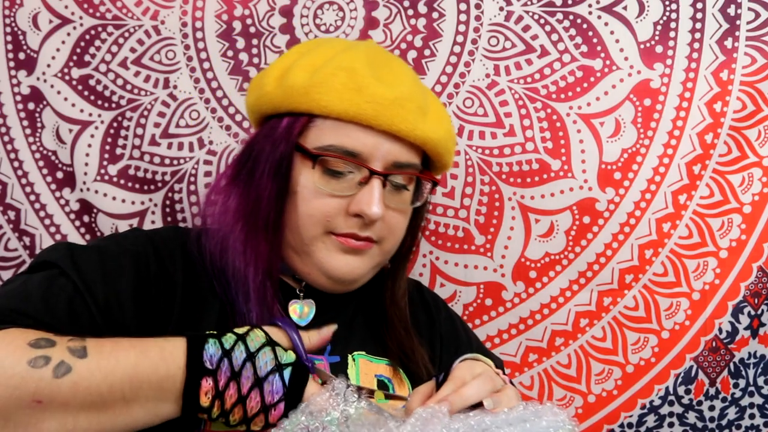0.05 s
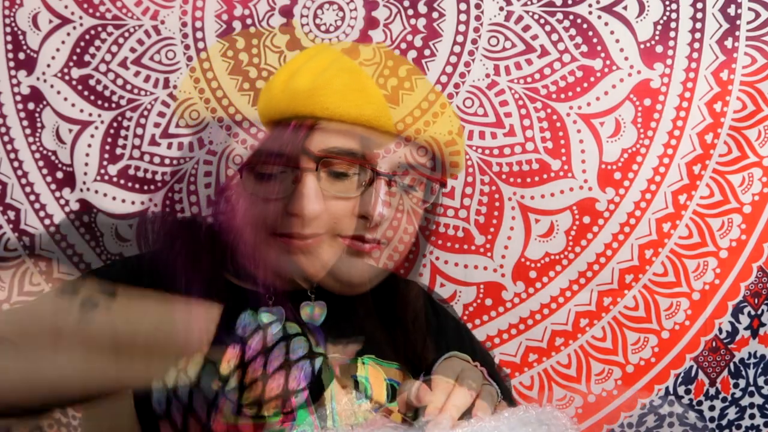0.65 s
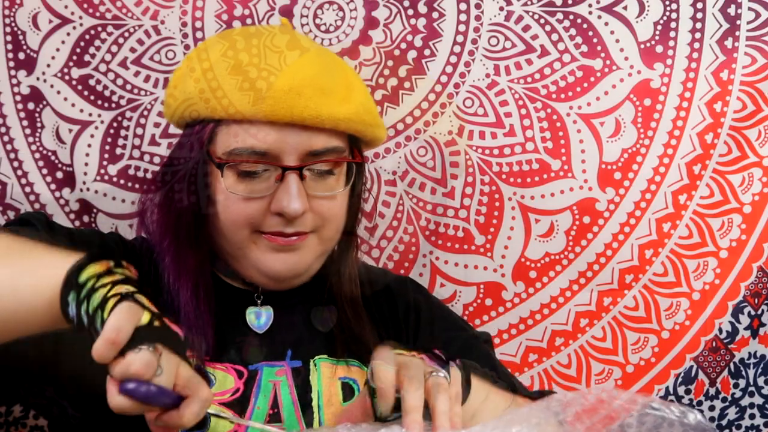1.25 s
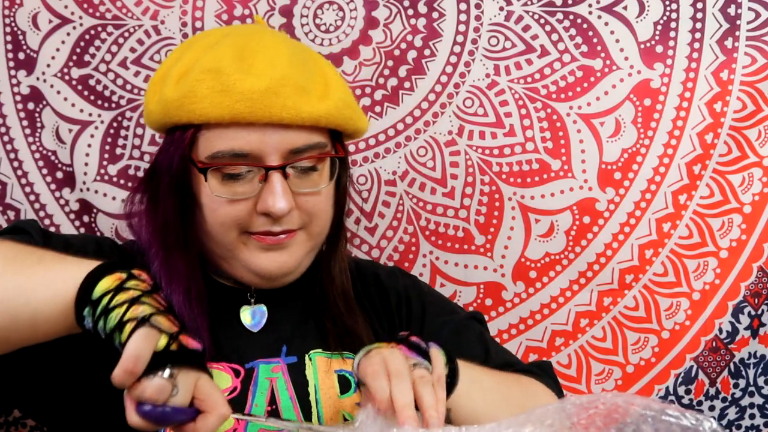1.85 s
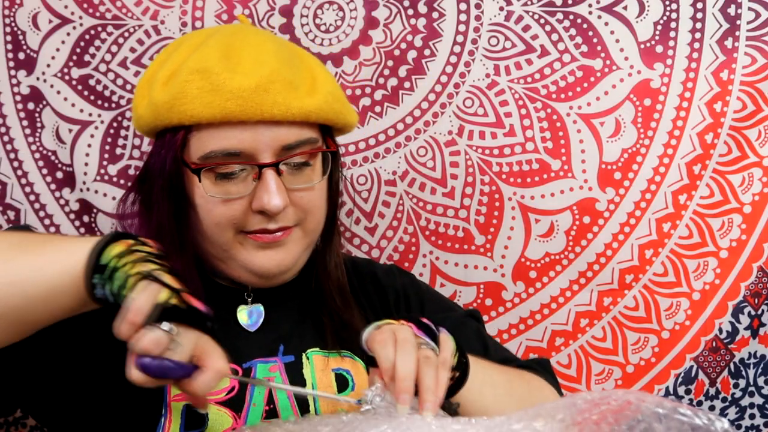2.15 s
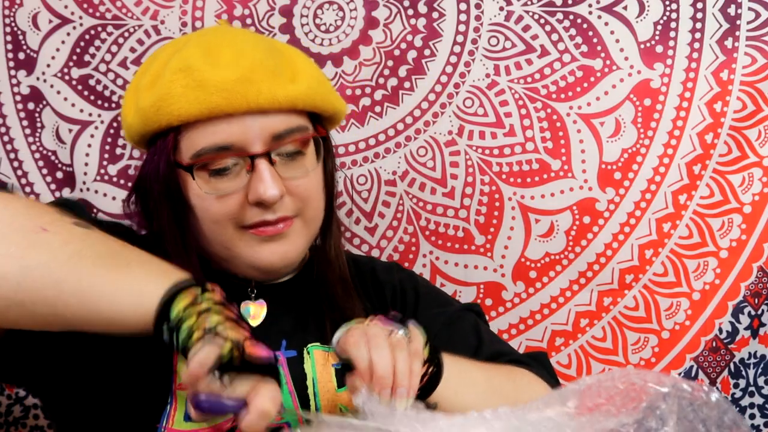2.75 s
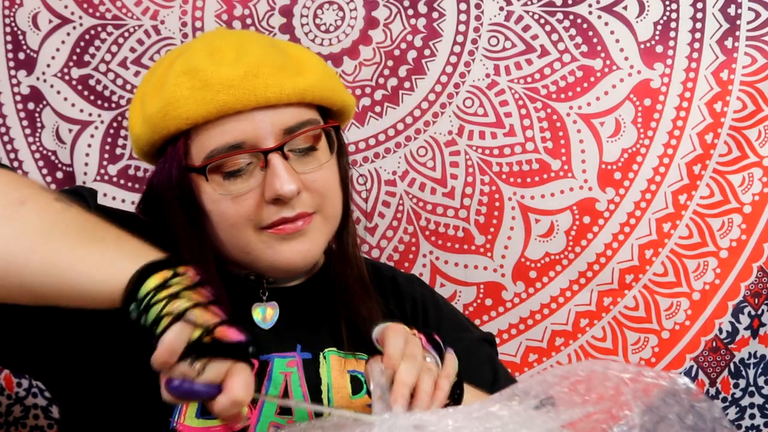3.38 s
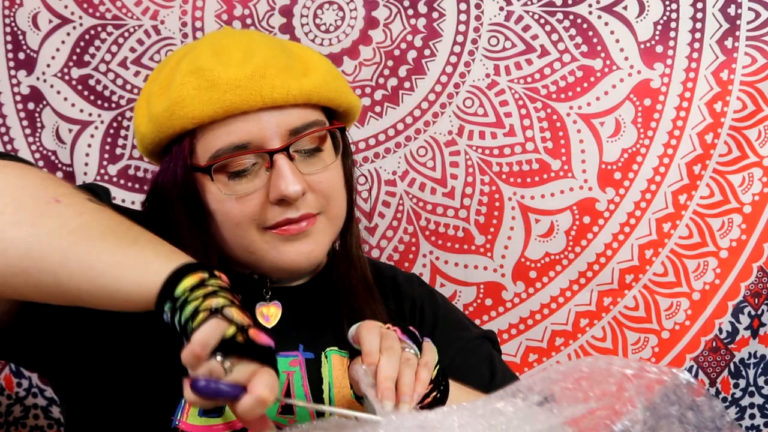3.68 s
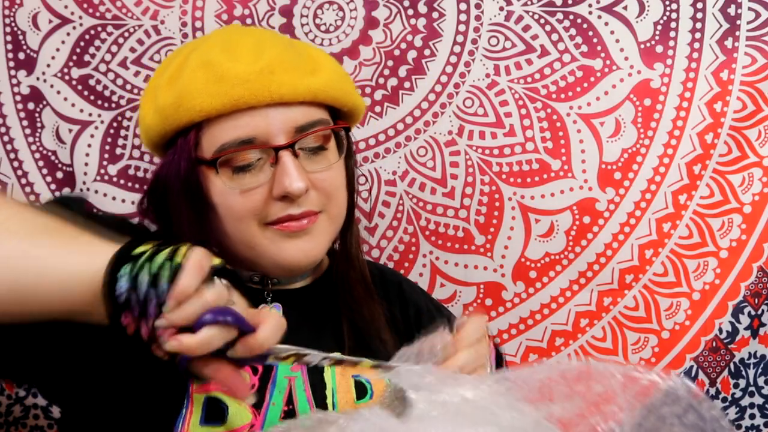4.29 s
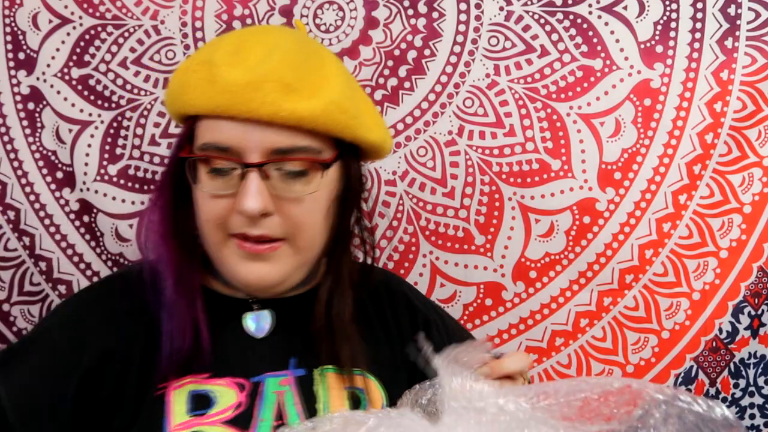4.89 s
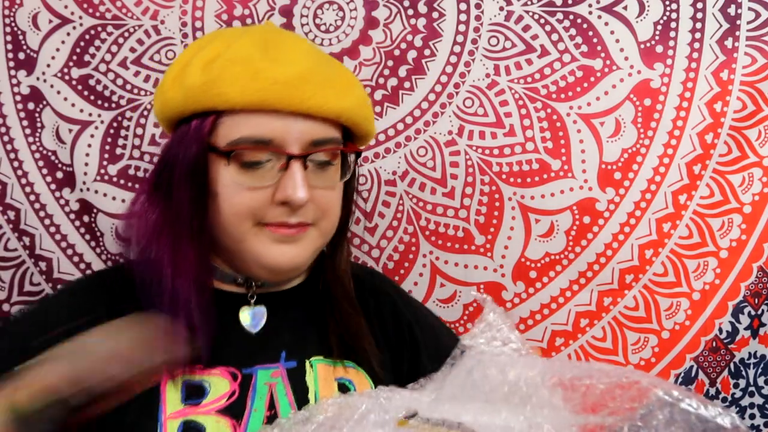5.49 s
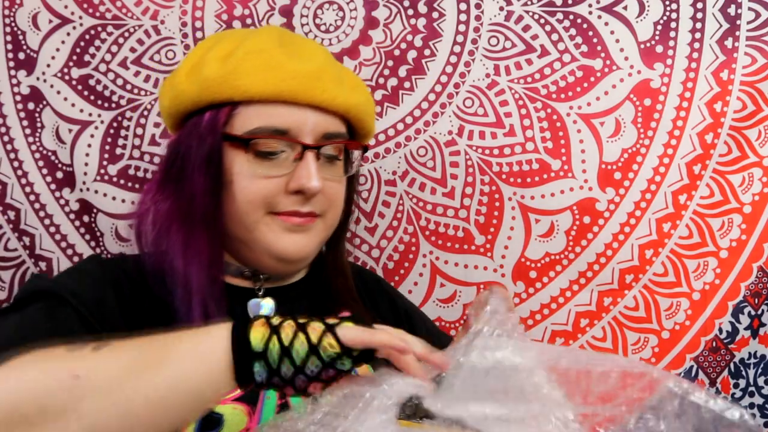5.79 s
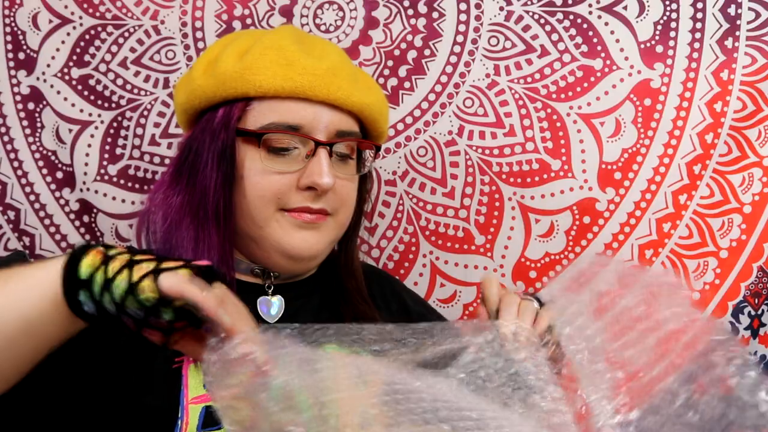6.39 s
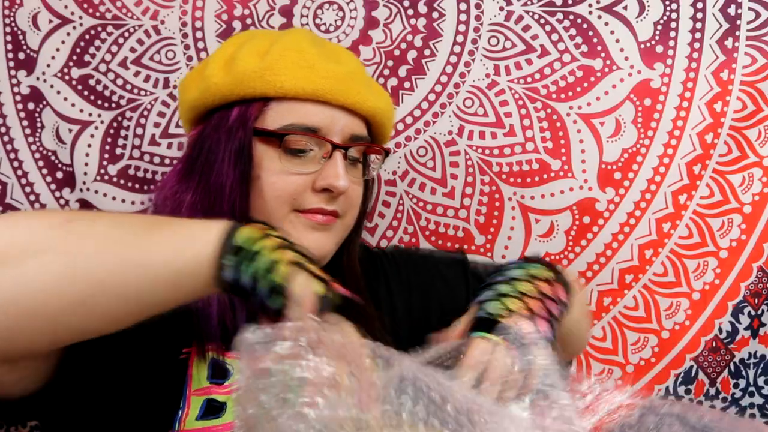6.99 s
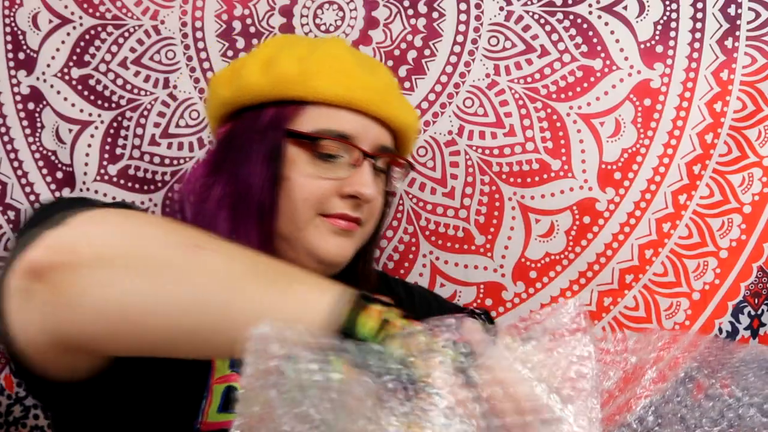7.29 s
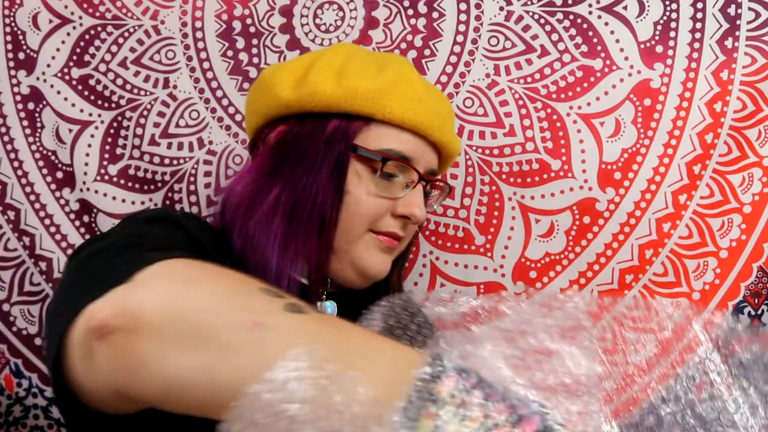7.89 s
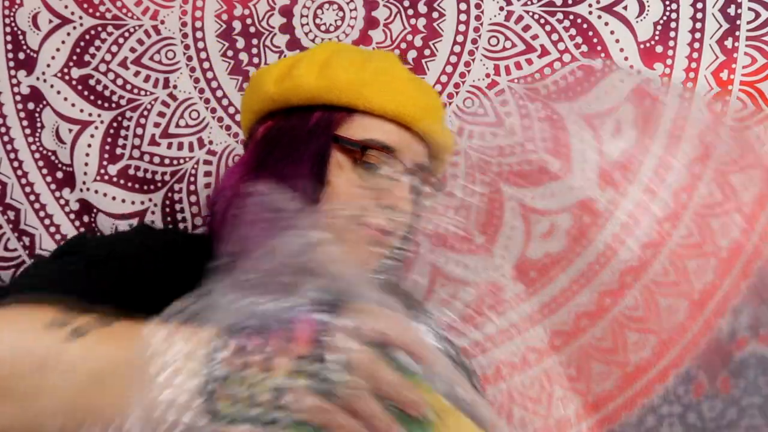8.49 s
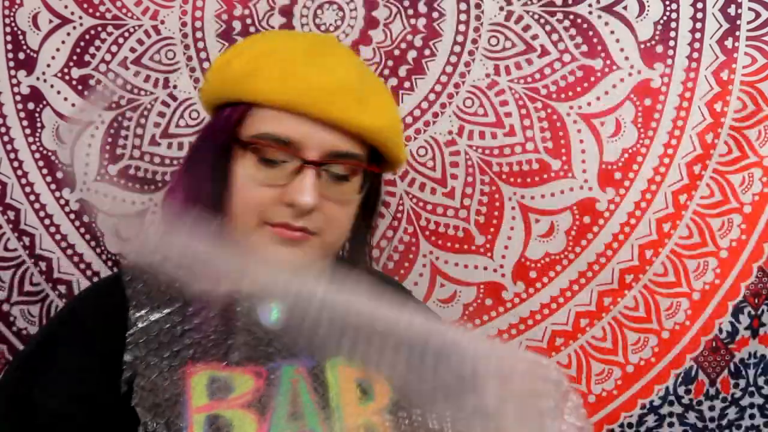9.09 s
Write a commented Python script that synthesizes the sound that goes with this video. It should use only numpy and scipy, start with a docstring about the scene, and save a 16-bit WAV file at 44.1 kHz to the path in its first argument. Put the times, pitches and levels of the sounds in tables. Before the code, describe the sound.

Scissors cut bubble wrap from a cardboard box in short, uneven strokes. The plastic crackles in showers of tiny clicks and sharp snaps, and the box takes soft, dull knocks. The blade squeaks once and later pops a bubble. After a brief lull, the freed sheet is pulled off, rustling, sliding and flapping, with a few tiny high pings. It is heard close up in a small room with a short echo.

```python
"""Bubble wrap crackles as scissors cut it from a cardboard box, then it is pulled off and lifted. Creases in
the plastic film buckle in showers of tiny clicks, and a few snap loudly. The sheet slides and flaps, taut
creases ping, and the box takes dull knocks. The blade squeaks once and pops one bubble. It is all heard close
up, in a small room with a short echo."""
import sys
import numpy as np
from scipy import signal
from scipy.fft import rfft, irfft, next_fast_len
from scipy.io import wavfile
from scipy.ndimage import map_coordinates

SR = 44100
rng = np.random.default_rng(int(sys.argv[2]) if len(sys.argv) > 2 else 0)


def pcm_store(signal):
    """Save signal as 16-bit PCM."""
    levels = np.round(np.clip(np.atleast_2d(signal), -1, 1) * 32767)
    wavfile.write(sys.argv[1], SR, levels.astype(np.int16).T)


N = 407925
TIME = np.arange(N) / SR


def amp(db):
    """Turn decibels into a number to multiply a sound by."""
    return 10 ** (np.asarray(db) / 20)


def along(points, hz):
    """Read a value between (Hz, value) points, spaced by musical pitch."""
    freqs, values = np.transpose(points)
    return np.interp(np.log(hz + 1), np.log(freqs), values)


def add(track, s, sound):
    """Mix a sound into the track at s seconds."""
    part = track[max(round(s * SR), 0):][:len(sound)]
    part += sound[:len(part)]


def wobble(rate):
    """A random curve that heads for a new value rate times a second."""
    return map_coordinates(rng.standard_normal(N // 8), [TIME * rate], order=1, mode="wrap")


def click(gain_db, size=2048):
    """The sharpest click of energy 1 with the tone gain_db(Hz)."""
    cepstrum = irfft(np.log(amp(gain_db(np.fft.rfftfreq(size, 1 / SR))) + 1e-6))
    # pack the energy at the start of the click
    cepstrum[1:size // 2] *= 2
    cepstrum[size // 2 + 1:] = 0
    pulse = irfft(np.exp(rfft(cepstrum)))
    return pulse / np.linalg.norm(pulse)


def hiss(tone):
    """Smooth noise with the given tone and an average power of 1."""
    colour = click(lambda hz: along(tone, hz), size=8192)
    noise = signal.oaconvolve(rng.standard_normal(N), colour)[:N]
    return noise / np.sqrt(np.mean(noise ** 2) + 1e-20)


def ripple(hz, per_octave):
    """Random peaks and dips in tone: each patch of film rings in its own way."""
    return map_coordinates(rng.standard_normal(80), [per_octave * np.log2(1 + hz / 100)], mode="nearest")


def buckles(rate, scatter_db, cap):
    """Creases give way: about rate kicks a second, very unequal in size, with average power near 1."""
    sizes = amp(scatter_db * np.minimum(rng.standard_normal(N), cap))
    kicks = (rng.random(N) < rate / SR) * sizes * rng.choice([-1, 1], N)
    window = signal.windows.hann(SR // 12)
    power = np.abs(signal.fftconvolve(kicks ** 2, window / window.sum(), "same"))
    return kicks / np.sqrt(power + 1e-6)


def avalanche(kicks, spill_db, span_s=.0014, count=2):
    """A buckle comes with small neighbours that give way just before and after it."""
    at = np.flatnonzero(kicks)
    shift, size = rng.standard_normal((2, count, N))[:, :, at]
    where = np.clip(at + np.round(shift * span_s * SR).astype(int), 0, N - 1)
    neighbours = amp(spill_db) * size * kicks[at]
    return kicks + np.bincount(where.ravel(), neighbours.ravel(), N)


def creases(kicks, tone, ripple_db, per_octave, count=200, size=1024):
    """Each kick sounds through one of many creases, each with its own ring."""
    clicks = [click(lambda hz: along(tone, hz) + ripple_db * ripple(hz, per_octave), size)
              for _ in range(count)]
    which, out = rng.integers(count, size=N), np.zeros(N + size)
    for at in np.flatnonzero(kicks):
        out[at:at + size] += kicks[at] * clicks[which[at]]
    return out[:N]


def movements(rows, attack_s, sag_db_per_s, release_db_per_s):
    """Power of crackle, treble and flapping: each movement takes hold, carries on and dies away."""
    power = np.zeros((3, N))
    for start, length, db, treble_db, flap_db in rows:
        span = slice(*np.searchsorted(TIME, [start, start + length + .5]))
        t = TIME[span] - start
        fade_db = sag_db_per_s * t + release_db_per_s * np.maximum(t - length, 0)
        envelope = np.minimum(t / attack_s, 1) * amp(db - fade_db)
        power[:, span] += (amp([[0], [treble_db], [flap_db]]) * envelope) ** 2
    return power


# Strokes of scissors and hand. Each row: start in seconds, length in seconds, level in dB,
# then treble and flapping, both in dB compared with that level.
SCISSOR_STROKES = [(-.04, 0.04, -44, -10, -11.5), (.165, 0.11, -51.5, -8, -9), (.25, .07, -43, -7.5, -13),
                   (.344, 0.21, -52, -3, -27), (.5, 0.13, -44, -10, -12), (.66, 0.16, -51.5, -6.5, -13.5),
                   (.815, .15, -48, -10, -11), (1.03, 0.11, -49.5, -5.5, -13),
                   (1.165, 0.19, -46.5, -7.5, -9.5), (1.38, 0.098, -45.5, -6, -13.5),
                   (1.485, 0.078, -40.5, -7.5, -17.5), (1.59, .11, -48, -5.5, -12.5),
                   (1.765, 0.052, -46, -5.5, -17), (1.85, .115, -38.5, -10, -12),
                   (1.98, .04, -45, -10, -18), (2.065, .135, -44, -12, -15.5),
                   (2.217, 0.12, -52.5, -18, -11.5), (2.535, .05, -44.5, -14, -16),
                   (2.66, 0.086, -46.5, -4, -13), (2.775, .19, -43.5, -6.5, -10),
                   (3.03, .065, -47.5, -8.5, -18), (3.165, .15, -46.5, -6, -15),
                   (3.315, 0.034, -42.5, -12, -10), (3.395, 0.058, -43.5, -6, -15),
                   (3.49, 0.049, -45.5, -14, -13), (3.585, .065, -50.5, -5, -5),
                   (3.68, 0.04, -48.5, -9, -13), (3.77, 0.19, -49, -7.5, -5), (3.865, 0.16, -48, -12, -9),
                   (4.07, 0.057, -37, -13, -12), (4.15, 0.14, -40, -8, -14.5),
                   (4.29, 0.05, -41.5, -8.5, -14), (4.395, .15, -45.5, -10.5, -10)]


def cuts():
    """How hard cutting stirs the wrap: the blades bite, then the film yields."""
    return movements(SCISSOR_STROKES, attack_s=0.026, sag_db_per_s=6, release_db_per_s=188.5)


# The tone of the film. Each row: frequency in Hz, relative level in dB.
FILM_TONE = [(150, -40), (450, -14), (800, -7.5), (1250, -2), (1800, 0.5), (2500, 1.5), (3200, -2),
             (4400, -0.5), (6000, -7), (8000, -16.5), (12000, -38)]


def rustle(kicks, rate, slide_db):
    """Many creases crackle, a few taut ones ring, and layers hiss as they slide over each other."""
    crackle = amp(-3) * creases(kicks, FILM_TONE, ripple_db=5.5, per_octave=2.599, count=400)
    taut = buckles(rate / 7, scatter_db=6, cap=1.7)
    ringing = amp(-8.5) * creases(taut, FILM_TONE, ripple_db=11.5, per_octave=6, count=300)
    return crackle + ringing + amp(slide_db) * hiss(FILM_TONE)


# The tone of the highest ticks. Each row: frequency in Hz, relative level in dB.
FIZZ_TONE = [(3500, -40), (6000, -5), (8000, 3), (10500, -1.5), (13000, -5), (16000, -10.5)]


def fizz(kicks, rate, treble_db):
    """The bright top of the crackle, joined by tiny creases that tick only in the treble."""
    tiny = buckles(0.61 * rate, scatter_db=13.5, cap=1.7)
    gain = amp(treble_db - 3 + 1.4 * wobble(40))
    return gain * creases(kicks + 0.99 * tiny, FIZZ_TONE, ripple_db=6.5, per_octave=3.5)


# The tone of the flapping sheet, tight and loose. Each row: frequency in Hz, relative level in dB.
TIGHT_FLAP_TONE = [(30, -52), (75, -18.5), (125, -5.5), (200, -4), (300, 4), (450, 0.5), (650, -5.5),
                   (1200, -25), (3000, -32)]
LOOSE_FLAP_TONE = [(30, -44), (70, -21), (125, -3.5), (190, -2), (300, -1.5), (450, -2.5), (750, -5.5),
                   (1300, -22), (3000, -68)]


def flapping(kicks, free, flap_db):
    """Once cut free, the sheet flaps deeper than while it is tight round the box."""
    folds = kicks + 0.86 * buckles(140, scatter_db=14, cap=1.76)
    tight = creases(folds * np.sqrt(1 - free), TIGHT_FLAP_TONE, ripple_db=5.5, per_octave=3.56)
    loose = creases(folds * np.sqrt(free), LOOSE_FLAP_TONE, ripple_db=6.5, per_octave=3.4)
    return amp(flap_db - 1.47 + 2.8 * wobble(25)) * (tight + loose)


# How much film is moving. Each row: time in seconds, crowding of the creases in dB (0 is ordinary).
MOVING_FILM = [(0, 0), (1.0, 0.5), (1.4, 2), (2.0, 1), (2.4, -4), (3.0, 0), (3.4, 3), (3.9, -2.5),
               (4.4, 2.5), (4.8, 0), (5.6, -2.5), (6.0, 4), (7.2, 2), (8.0, 0), (8.6, 5), (9.25, 1.5)]


def sheet(level_db, treble_db, flap_db, freed_s=4.6, unwrap_s=.62):
    """The whole sheet rustles, fizzes and flaps; harder handling buckles more creases."""
    crowding_db = np.interp(TIME, *np.transpose(MOVING_FILM))
    free = np.clip((TIME - freed_s) / unwrap_s, 0, 1)  # 0 is tight, 1 is loose
    jerk_db = 1.4 * wobble(55)  # the film yields in jerks
    rate = 900 * amp(2 * crowding_db + .7 * (level_db - level_db.mean()) + jerk_db)
    kicks = buckles(1.2 * rate, scatter_db=8.5, cap=1.85)
    clusters = avalanche(kicks, spill_db=-6)
    middle = rustle(clusters, rate, slide_db=-7 + 0.14 * crowding_db + 0.45 * free)
    high = fizz(clusters, rate, treble_db)
    low = flapping(kicks, free, flap_db)
    return amp(level_db + jerk_db) * (middle + high + low)


# How long the room rings. Each row: frequency in Hz, seconds to fade by 60 dB (called t60).
ECHO_FADES = [(150, 0.21), (1500, 0.53), (6000, 0.4), (15000, 0.41)]


def room_echo(sound, gap_s=0.0026, pieces=30):
    """The walls answer after a short gap, the middle pitches lasting longest."""
    out, step = np.zeros(N), N // pieces + 1
    for start in range(0, N, step):  # a fresh echo for each piece, as the wrap moves
        hz, t, noise = signal.stft(rng.standard_normal(SR // 2), SR, nperseg=256)
        fade = amp(-60 * t / along(ECHO_FADES, hz)[:, None])
        tail = signal.istft(noise * fade, SR, nperseg=256)[1]
        tail *= np.arange(len(tail)) > gap_s * SR
        add(out, start / SR, signal.fftconvolve(sound[start:start + step], tail / np.linalg.norm(tail)))
    return out


# The tone of the quiet room. Each row: frequency in Hz, relative level in dB.
BACKGROUND_TONE = [(20, -43), (38, -28), (49, 3), (62, -11.5), (250, -1), (1000, -20.5), (16000, -30)]


def background():
    """A faint, steady, low rush fills the room."""
    return amp(-71) * hiss(BACKGROUND_TONE)


# The tone of a snap's body and of its sharp edge. Each row: frequency in Hz, relative level in dB.
SNAP_BODY = [(60, -32), (220, 9), (600, -0.5), (1000, 6), (1600, 5.5), (2600, -6.5), (4500, 2.5),
             (8000, -16), (14000, -43)]
SNAP_EDGE = [(2500, -14), (6000, -3.5), (8000, 2.5), (11000, -1.5), (13500, -0.5), (16000, -5.5)]


def snap(pitch_hz, treble_db, width_octaves=0.58, rattle_t60=0.029, rebound=0.74, burst_s=.0014):
    """A taut crease flips at its own pitch, rebounds at once and shakes the film around it."""
    def tone(hz):
        ring = amp(-8.5) / (1 + (np.log2((hz + 1) / pitch_hz) / width_octaves) ** 2)
        body = amp(along(SNAP_BODY, hz) - 16.5) * (3000 / pitch_hz)  # larger creases have more body
        edge = amp(along(SNAP_EDGE, hz) + treble_db - 11.5)
        bass_loss = hz ** 2 / (hz ** 2 + 120 ** 2) + 1e-3  # so small a patch makes no deep bass
        return 20 * np.log10((ring + body + edge) * bass_loss) + 2.5 * ripple(hz, per_octave=4.007)
    t = np.arange(2048) / SR
    shake = amp(-25.5 - 60 * t / rattle_t60) * rng.standard_normal(len(t))
    shake[0] = 1  # the flip itself
    shake[int(rng.uniform(.00012, .0006) * SR)] -= rebound
    return np.sqrt(burst_s * SR) * signal.fftconvolve(click(tone), shake / np.linalg.norm(shake))


# Loud snaps. Each row: start in seconds, level in dB, pitch in Hz, treble boost or cut in dB.
LOUD_SNAPS = [(0.1143, -36.5, 2960, -22), (0.188, -32.5, 3250, -4), (0.2263, -36.5, 4000, -9),
              (0.3165, -30, 5400, -10), (0.524, -32, 1820, -26), (0.5606, -31.5, 2400, 0),
              (0.6, -32, 4000, 0), (0.9563, -32, 2200, 3), (1.0628, -25, 2100, -1.5),
              (1.1776, -32, 3900, -3), (1.2222, -33, 4900, 1), (1.2284, -34, 3680, -7.5),
              (1.2754, -31.5, 1900, -12), (1.3833, -34.5, 2900, -3), (1.4246, -29, 2070, -28),
              (1.524, -29, 3650, -13), (1.5618, -31, 3680, 6), (1.7081, -34, 3680, -7),
              (1.9425, -27.5, 3760, -26), (2.0048, -30, 1900, -3), (2.0775, -32, 2000, -23),
              (2.11, -26.5, 3280, -19), (2.1449, -27.5, 2500, -4), (2.2031, -38, 2570, -3),
              (2.2617, -37.5, 3800, -7), (2.3457, -41, 3400, 4), (2.409, -34, 1950, -1),
              (2.4968, -32, 5500, 6), (2.56, -36, 4200, 22), (2.585, -35.5, 2000, -24),
              (2.6588, -40, 3400, -19), (2.6941, -36, 2200, -15), (2.709, -34.5, 2360, -8),
              (2.8684, -31, 3500, -9), (2.9024, -27.5, 1700, 6), (2.9308, -30, 3700, 7),
              (2.9478, -25, 4020, -7), (3.058, -34.5, 2870, -1), (3.321, -30, 3000, -16),
              (3.35, -40, 2020, -9), (3.4114, -32.5, 3320, -21), (3.5824, -37, 6500, 12),
              (3.832, -33, 2980, -3), (3.8867, -25.5, 3200, -11), (3.8906, -24, 2070, -7),
              (3.8922, -22, 2500, -9), (4.0382, -27, 3370, -3), (4.043, -31.5, 3700, -8),
              (4.085, -34, 2500, -5), (4.086, -25.5, 3330, 2), (4.102, -30, 2000, -15),
              (4.109, -26, 3300, -2), (4.1315, -26, 2250, 0), (4.4138, -25, 2450, 5.5),
              (4.7268, -36.5, 4370, -5), (4.767, -44, 1800, -11), (4.8267, -38, 2130, -7),
              (5.0072, -26, 4620, -29), (5.0106, -28, 4750, -20), (5.0508, -32.5, 4300, -18),
              (5.0744, -29.5, 4330, -22), (5.1127, -32, 4400, -18), (5.127, -32, 4100, -16),
              (5.3088, -52, 2110, -20), (5.383, -44, 4100, -18), (5.8936, -26.5, 3800, -31),
              (5.934, -27.5, 2430, -21), (6.0291, -24, 4300, -13), (6.0946, -23.5, 3830, -37),
              (6.2975, -30, 2500, -19), (6.365, -29.5, 3800, -11), (6.4, -27, 2700, -24),
              (6.4782, -27.5, 2600, -4), (6.8392, -28, 4900, 13.5), (7.6408, -32, 4600, -9),
              (7.8701, -31, 2670, -19), (8.097, -39.5, 3600, -17), (8.282, -27.5, 2820, -12)]


def loud_snaps():
    """The loudest creases flip one by one."""
    out = np.zeros(N)
    for s, db, pitch_hz, treble_db in LOUD_SNAPS:
        add(out, s, amp(db) * rng.choice([-1, 1]) * snap(pitch_hz, treble_db))
    return out


def stray_snaps(level_db, per_second=7.3, count=300):
    """Lesser snaps come at random, louder when the handling is harder."""
    out = np.zeros(N)
    times = np.cumsum(rng.exponential(size=count)) / per_second
    for s, (size, pitch, edge) in zip(times[times < TIME[-1]], rng.standard_normal((count, 3))):
        sound = snap(pitch_hz=3040 * 2 ** (0.3 * pitch), treble_db=-4.5 + 5 * edge)
        add(out, s, amp(level_db[int(s * SR)] + 3.5 + 1.5 * size) * sound)
    return out


# Ringing creases. Each row: start in seconds, level in dB, pitch in Hz.
CREASE_PINGS = [(0.19, -24, 2500), (6.079, -16.5, 4100), (6.188, -27, 5200), (6.324, -19, 5200),
                (6.607, -21, 3520), (8.031, -24, 2690)]


def pings(t60=0.0078, attack_s=0.00043):
    """A taut crease in the film rings like a tiny drum."""
    out, t = np.zeros(N), np.arange(SR // 20) / SR
    rise = 1 - np.exp(-t / attack_s)
    for s, db, hz in CREASE_PINGS:
        add(out, s, amp(db - 60 * t / t60) * rise * np.sin(2 * np.pi * hz * t))
    return out


# Dull knocks on the box. Each row: start in seconds, level in dB, pitch in Hz.
BOX_KNOCKS = [(1.063, -36.5, 253), (1.215, -39.5, 446), (1.324, -39.5, 293), (1.422, -42, 292),
              (1.524, -40.5, 296), (2.073, -38.5, 476), (2.814, -40.5, 270), (2.9, -30.5, 492),
              (2.945, -36, 293), (3.366, -39.5, 520), (3.701, -43, 210), (3.831, -33, 291),
              (3.887, -33, 750), (4.033, -42, 843), (4.083, -32.5, 517), (4.411, -41, 382),
              (5.189, -40, 156), (5.945, -34.5, 602), (6.057, -34, 180), (6.066, -32.5, 700),
              (6.281, -35, 224), (6.4, -36.5, 498), (7.47, -34.5, 404), (8.963, -35.5, 303),
              (9.208, -36, 368)]


def knocks(t60=0.071, attack_s=0.0014, overtone_ratio=1.49, overtone_db=-6):
    """Hands and blade bump the padded box, which rings briefly; its higher note dies twice as fast."""
    out, t = np.zeros(N), np.arange(SR // 6) / SR
    rise = 1 - np.exp(-t / attack_s)
    fade = amp(-60 * t / t60)
    for s, db, hz in BOX_KNOCKS:
        low = fade * np.sin(2 * np.pi * hz * t)
        high = amp(overtone_db) * fade ** 2 * np.sin(2 * np.pi * overtone_ratio * hz * t)
        add(out, s, amp(db - 1) * rise * (low + high))
    return out


# The notes of taut film on the blade. Each row: pitch in Hz, relative level in dB, t60 in seconds.
SQUEAK_NOTES = [(400, -22, 0.018), (920, -5, 0.028), (1206, -1, 0.045), (1840, 2, 0.018), (2730, -12, .008)]


def squeak(start_s=1.877, slip_hz=325, jitter=0.071, slips=9):
    """The film sticks and slips on the blade in one short chirp."""
    out, t = np.zeros(N), np.arange(SR // 20) / SR
    ring = sum(amp(db - 60 * t / t60) * np.cos(2 * np.pi * hz * t) for hz, db, t60 in SQUEAK_NOTES)
    ring = signal.lfilter(*signal.butter(2, 3000, fs=SR), ring)  # soft film slips without a hard edge
    for k, (late, strength) in enumerate(rng.standard_normal((slips, 2))):
        add(out, start_s + (k + jitter * late) / slip_hz, amp(-33 + 1.8 * strength) * ring)
    return out


def pop(start_s=3.889, db=-49, hz=75, t60=0.11):
    """The blade bursts one bubble, whose air gives a low puff under the snap."""
    out, t = np.zeros(N), np.arange(SR // 6) / SR
    add(out, start_s, amp(db - 60 * t / t60) * np.sin(2 * np.pi * hz * t))
    return out


# Tugs at the freed sheet. Each row: start in seconds, length in seconds, level in dB,
# then treble and flapping, both in dB compared with that level.
SHEET_TUGS = [(4.86, 0.15, -55.5, -11, -12), (4.985, .025, -41.5, -11, -19), (5.05, .1, -42.5, -10.5, -16),
              (5.165, 0.041, -49.5, -7, -3.5), (5.385, 0.046, -54.5, -22, -6),
              (5.47, .26, -47.5, -10, -10.5), (5.745, .14, -42, -10, -10), (5.865, 0.11, -38.5, -8.5, -11),
              (6.015, .09, -36.5, -8, -9), (6.11, .07, -40, -4, -16), (6.22, .11, -38.5, -6, -9),
              (6.34, .067, -36.5, -10, -8.5), (6.49, 0.22, -42.5, -6.5, -13), (6.71, 0.13, -41.5, -8, -11),
              (6.92, 0.11, -44.5, -7, -11.5), (7.085, .105, -41.5, -10, -12.5),
              (7.221, .3, -45.5, -10, -15), (7.55, .17, -43.5, -7, -14.5), (7.77, .095, -43.5, -12, -14),
              (7.88, .05, -52.5, -23, -4), (8.007, .07, -50, -6, -15), (8.205, .15, -44.5, -12, -11),
              (8.4, 0.35, -47, -13.5, -9), (8.776, .3, -50, -12.5, -11), (9.05, .11, -44, -9.5, -24),
              (9.148, 0.084, -40.5, -11.5, -5.5)]


def pulls():
    """How hard pulling stirs the wrap: the sheet tightens, so each tug grows slightly."""
    return movements(SHEET_TUGS, attack_s=0.043, sag_db_per_s=-1.1, release_db_per_s=137.5)


def handling(rest_db=-56, rest_treble_db=-7.5, rest_flap_db=-16.5):
    """Cuts, pulls and settling film add up to a level in dB, with treble and flapping relative to it."""
    settling = (amp(rest_db) * amp([[0], [rest_treble_db], [rest_flap_db]])) ** 2
    level_db, treble_db, flap_db = 10 * np.log10(cuts() + pulls() + settling)
    return level_db, treble_db - level_db, flap_db - level_db


def scene():
    """The wrap and the box, their echo, and the quiet room, in one channel."""
    level_db, treble_db, flap_db = handling()
    film = sheet(level_db, treble_db, flap_db) + loud_snaps() + stray_snaps(level_db)
    near = film + pings() + knocks() + squeak() + pop()
    return (near + amp(-12.5) * room_echo(near) + background())[None]


def record(dry, top_hz=16050):
    """Remove the very highest treble, everything above top_hz."""
    size = next_fast_len(N + SR // 4)
    kept = np.fft.rfftfreq(size, 1 / SR) < top_hz
    return irfft(rfft(dry, size) * kept, size)[:, :N]


dry = scene()
out = record(dry)
pcm_store(out)
```